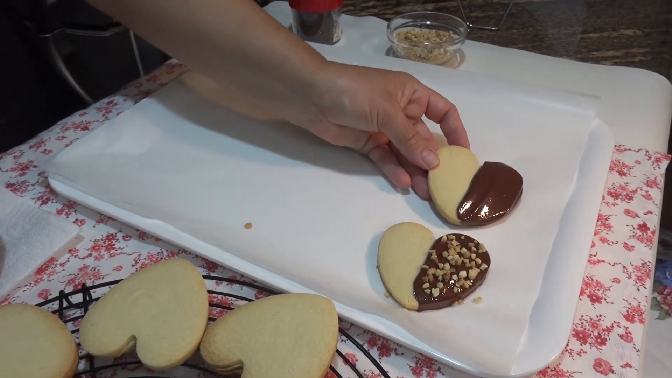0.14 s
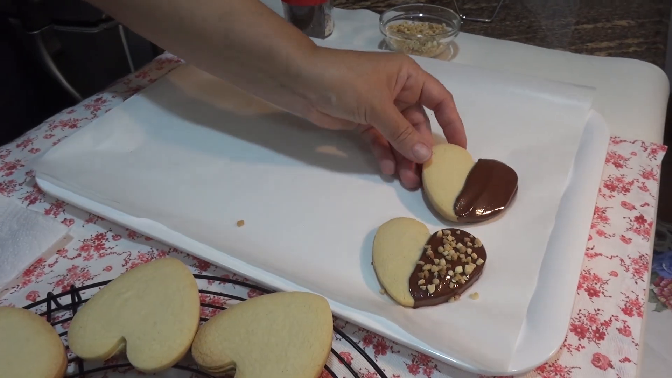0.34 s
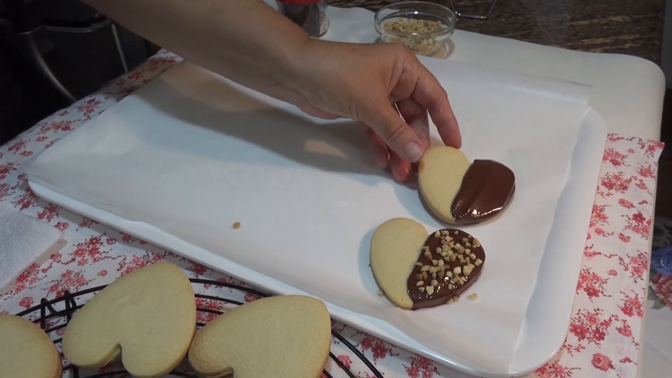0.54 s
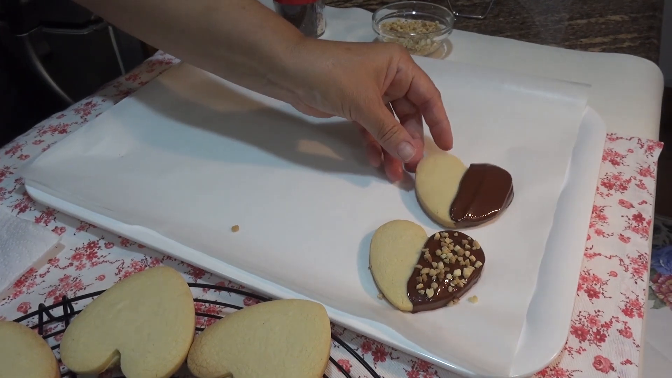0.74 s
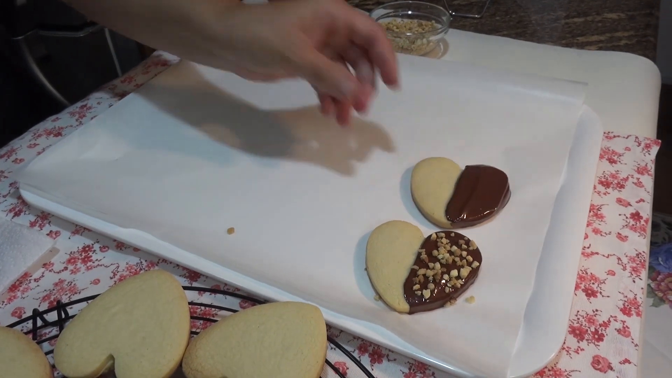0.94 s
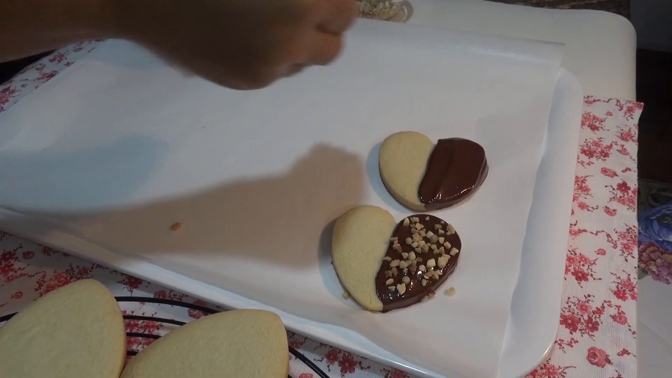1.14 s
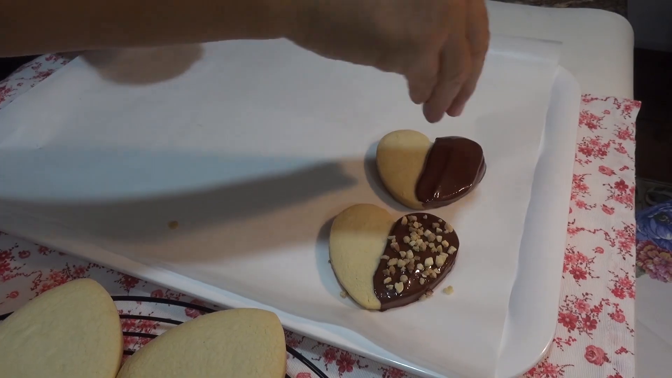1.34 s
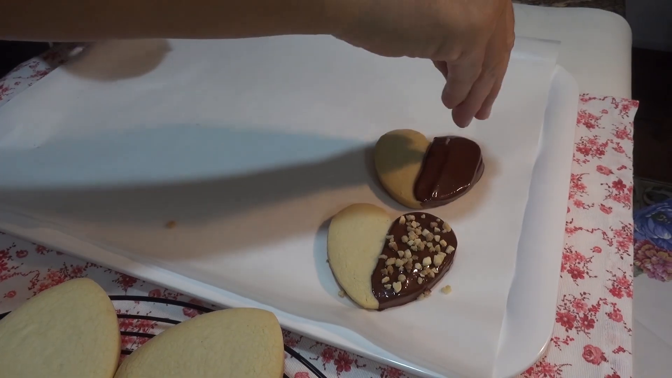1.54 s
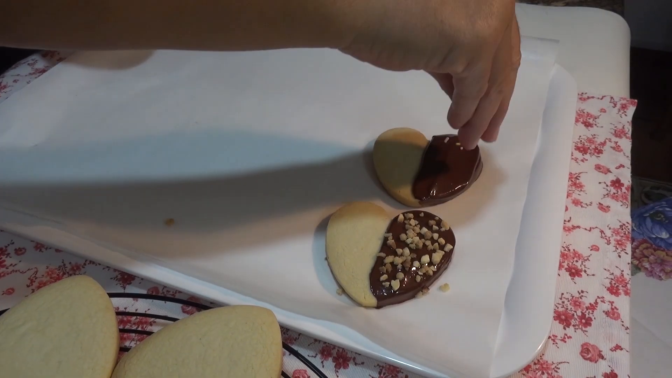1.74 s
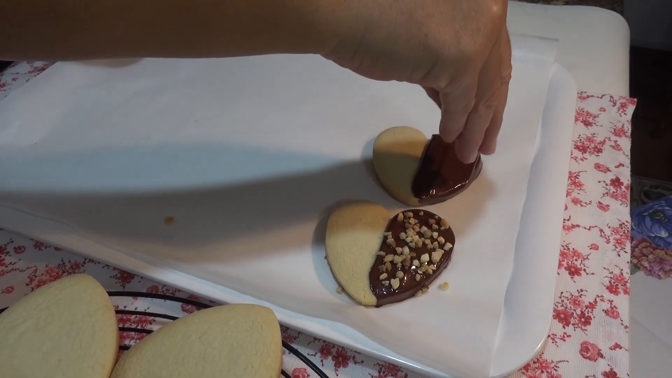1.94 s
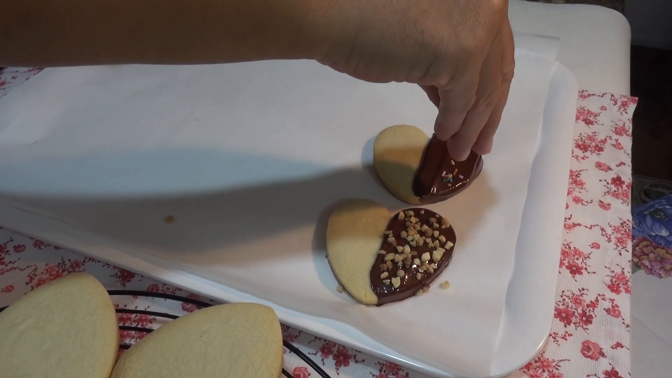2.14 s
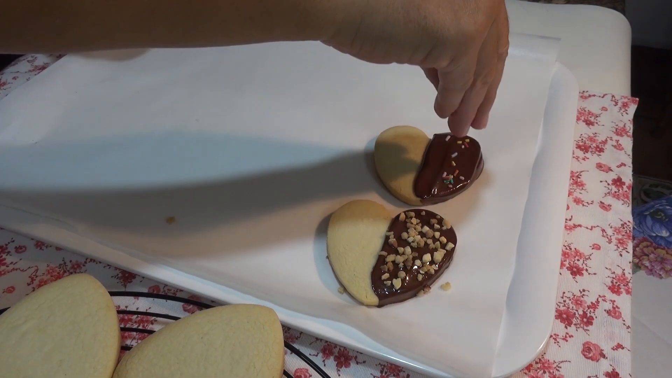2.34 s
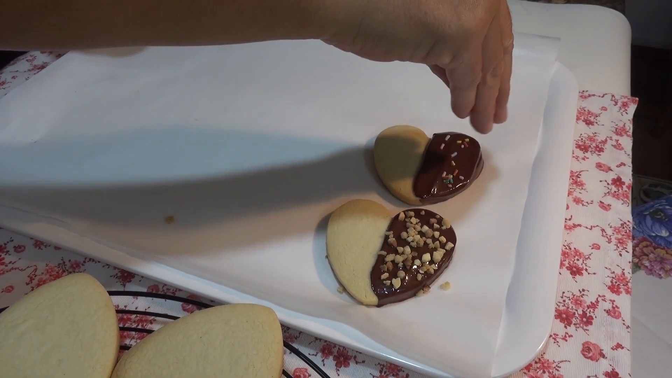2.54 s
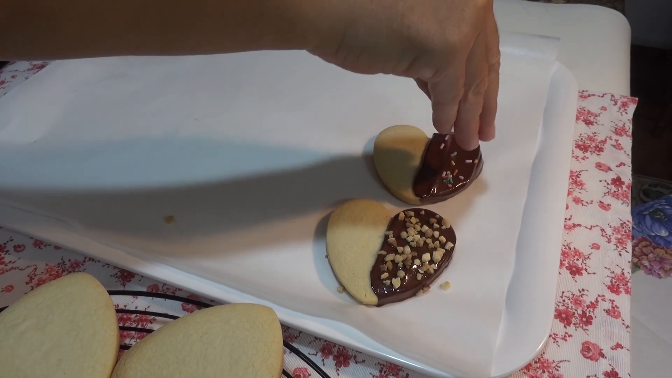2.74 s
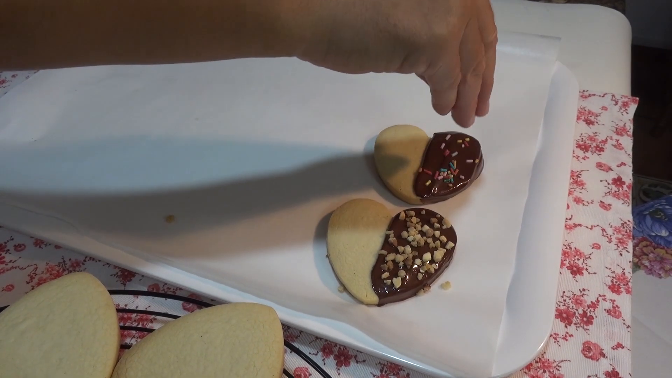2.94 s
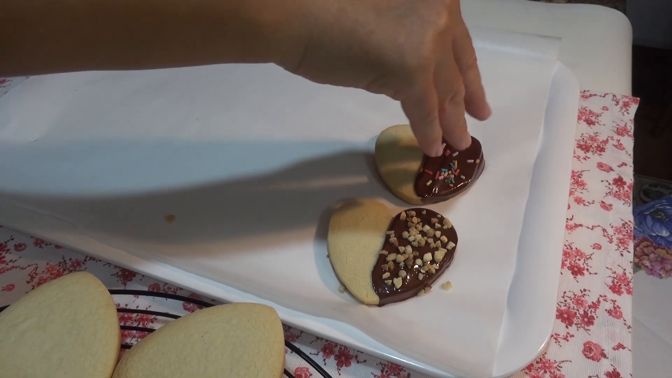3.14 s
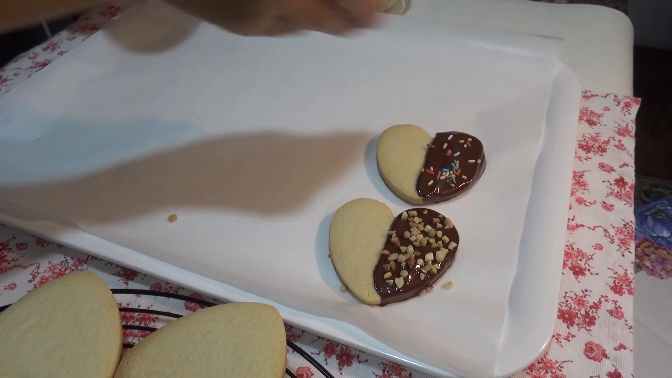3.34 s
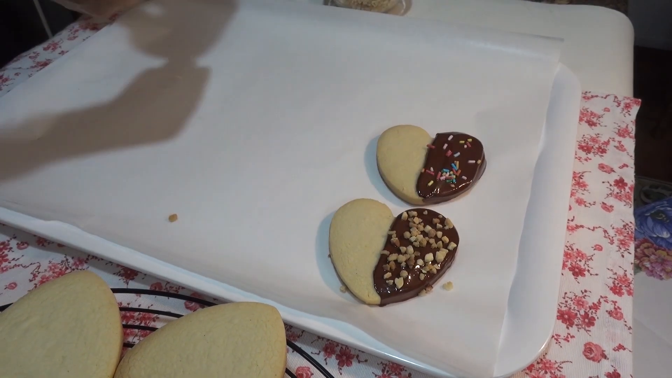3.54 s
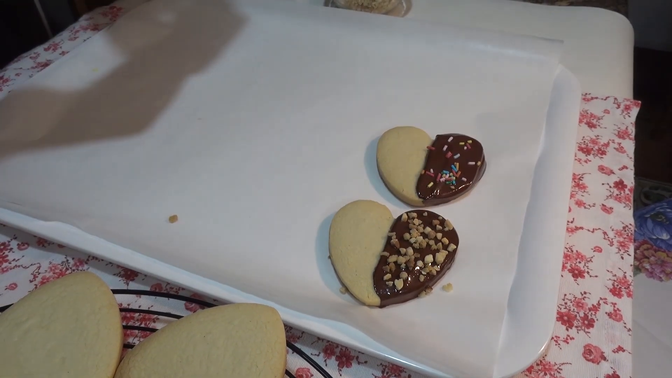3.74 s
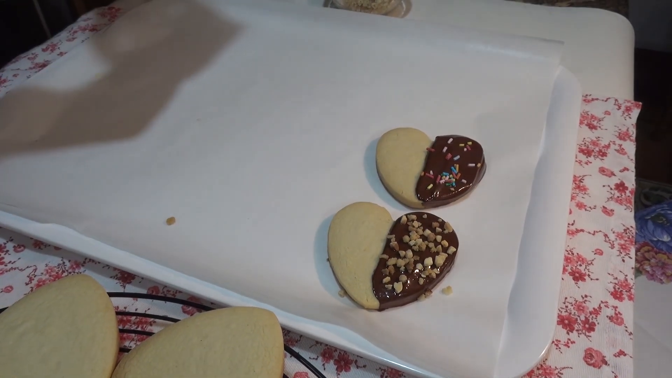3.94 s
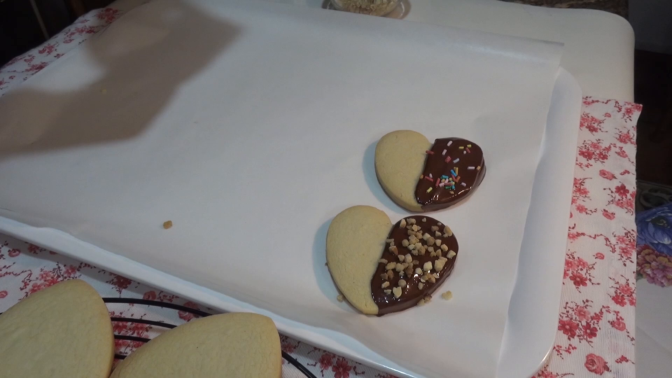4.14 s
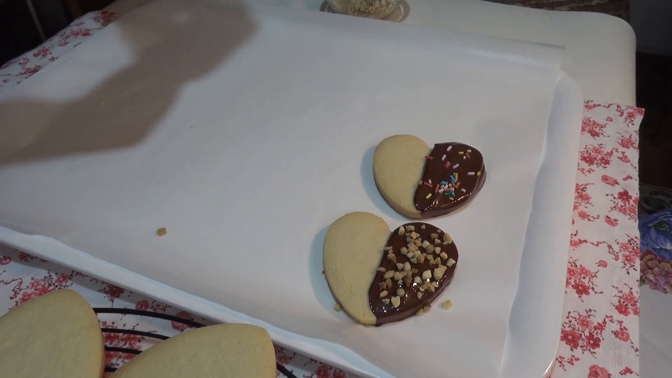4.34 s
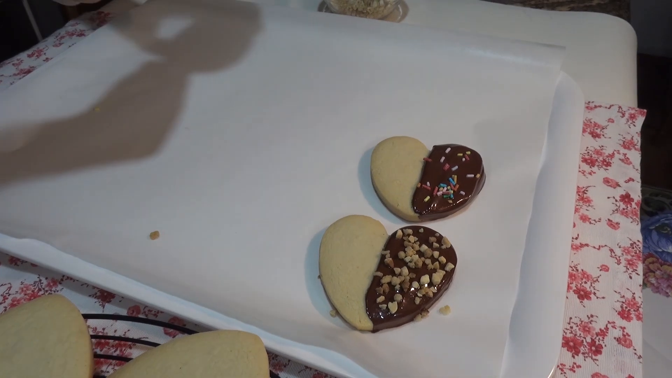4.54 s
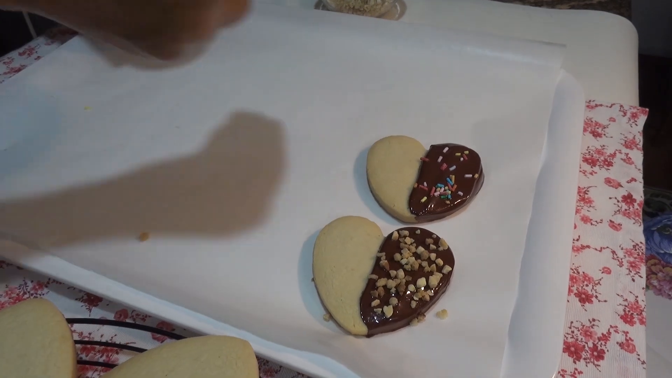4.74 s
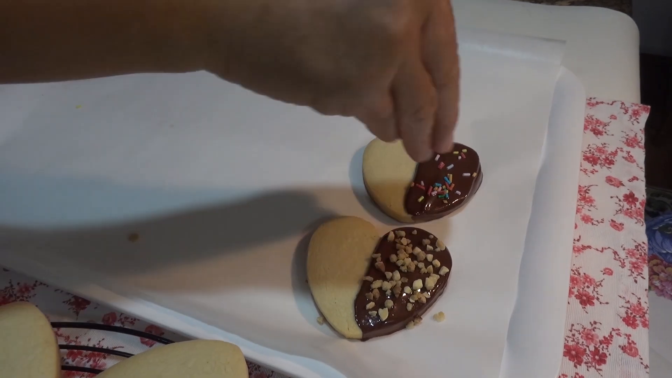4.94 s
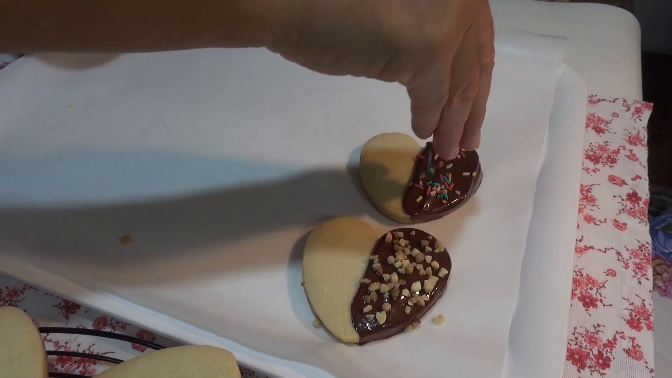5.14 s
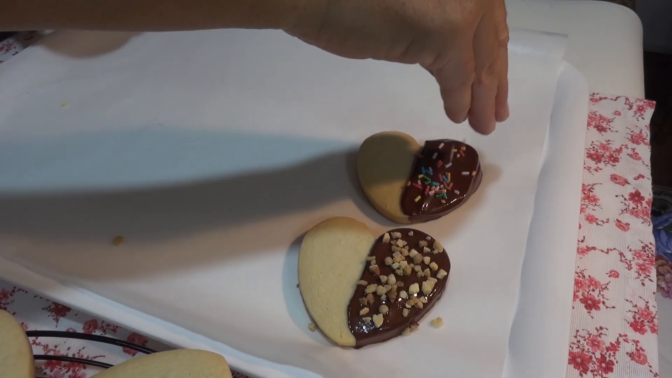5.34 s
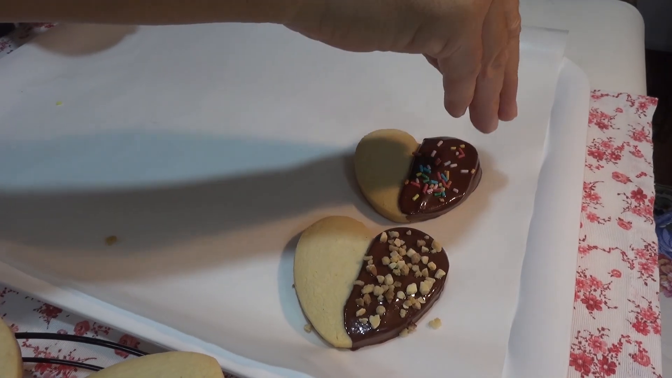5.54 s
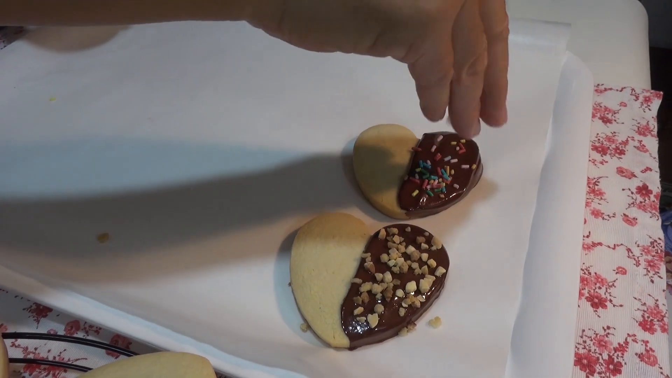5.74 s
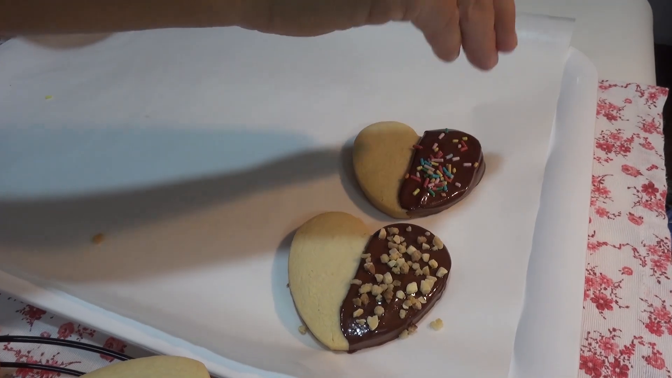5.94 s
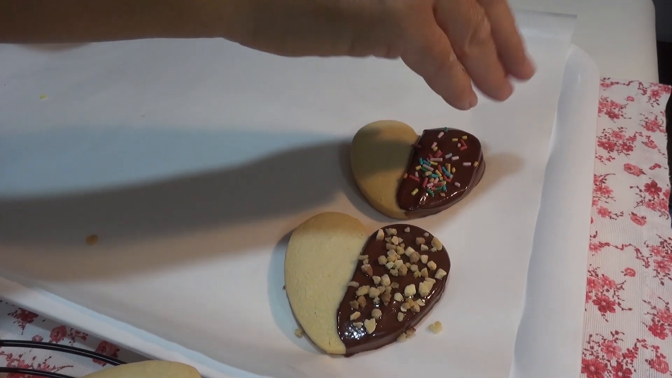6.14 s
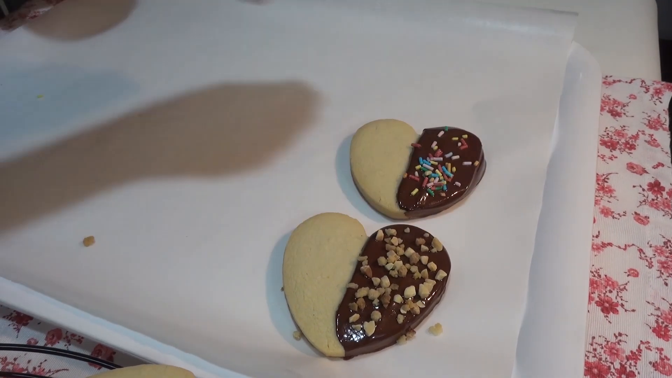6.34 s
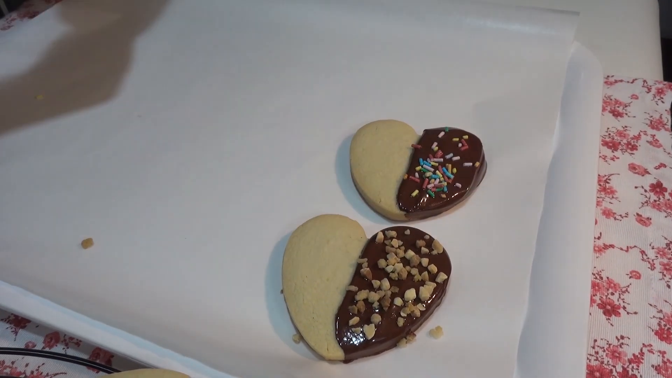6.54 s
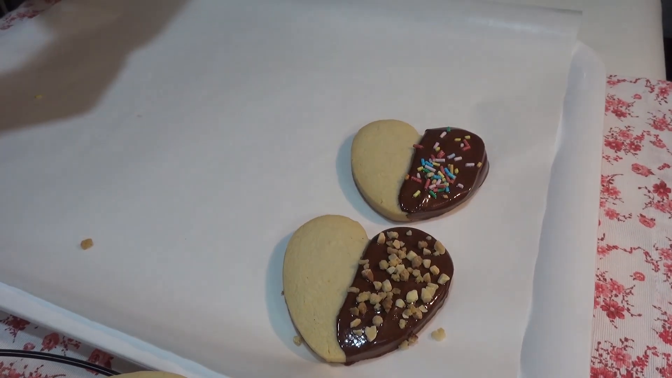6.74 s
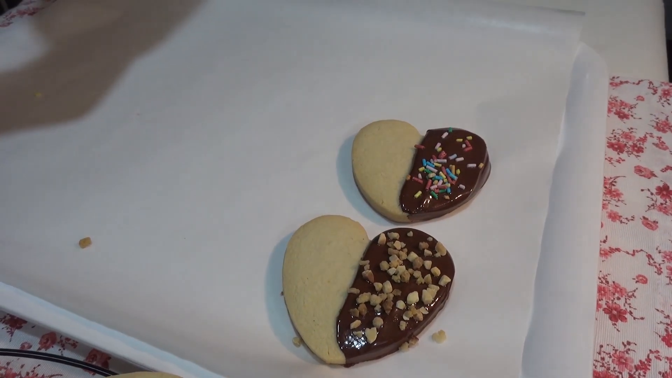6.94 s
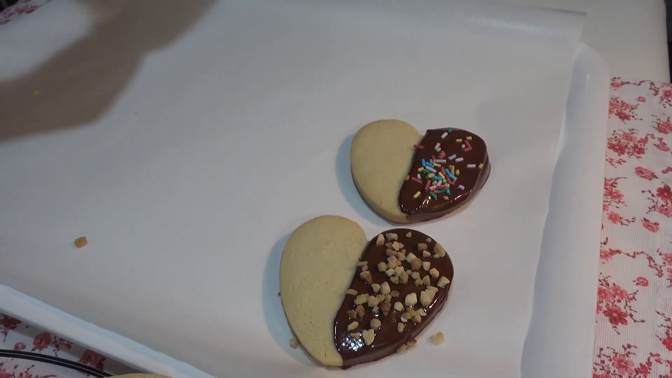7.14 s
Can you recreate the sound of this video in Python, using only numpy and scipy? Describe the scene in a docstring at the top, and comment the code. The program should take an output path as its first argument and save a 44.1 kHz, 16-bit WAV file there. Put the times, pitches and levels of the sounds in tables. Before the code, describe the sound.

Close stereo microphones in a small kitchen with a steady low motor hum and dull air rush. A cookie slides briefly on baking paper with ticks and soft taps, then a dish knocks sharply. A thin bag crackles briefly, sparse tiny sprinkles tick, and fingers rummage loudly in crisp plastic. More sprinkles patter with a dull scuff, then a shorter bag crackle ends it.

```python
"""Sprinkles are put on chocolate-dipped cookies on a paper-lined tray, in a small kitchen with a motor.
Sine harmonics hum and coloured noise rushes throughout. A cookie slides into place: hissing paper, ticks, damped taps.
A dish is knocked (decaying modes and noise clatter). At 1.2 s the hum jumps in phase with a low thump,
and a thin plastic bag crackles briefly. Sprinkles tick (ringing noise bursts), fingers dig in the bag
(crackle, ringing folds, snaps), more sprinkles fall with a dull scuff, and the fingers dig again."""
import sys
import numpy as np
from scipy import signal
from scipy.fft import rfft, irfft
from scipy.io import wavfile
from scipy.ndimage import uniform_filter1d

SR = 44100
rng = np.random.default_rng(int(sys.argv[2]) if len(sys.argv) > 2 else 0)


def waveform_to_disk(signal):
    """Save audio, clipped to [-1, 1], as 16-bit WAV at the path in sys.argv[1]."""
    frames = np.transpose(np.atleast_2d(signal))
    scaled = np.clip(frames, -1, 1) * 32767
    samples = np.round(scaled).astype(np.int16)
    wavfile.write(sys.argv[1], SR, samples)


N = 321048


def from_db(db):
    """Decibels to gain."""
    return 10 ** (np.asarray(db) / 20)


def rms_one(x):
    """Scale to unit power."""
    return x / np.sqrt(np.mean(x ** 2) + 1e-20)


def at_hz(points, hz):
    """Read a table on a log-frequency axis."""
    table_hz, values = np.array(points).T
    return np.interp(np.log(np.maximum(hz, 1)), np.log(table_hz), values)


def colour(x, spectrum, size=4096):
    """Causal (minimum-phase) filter with the given spectrum."""
    gain = from_db(at_hz(spectrum, np.fft.rfftfreq(size, 1 / SR)))
    cepstrum = irfft(np.log(gain))
    cepstrum[1:size // 2] *= 2
    cepstrum[size // 2 + 1:] = 0
    response = irfft(np.exp(rfft(cepstrum)))
    return signal.fftconvolve(x, response[None], axes=-1)[:, :x.shape[-1]]


def butter(x, order, hz, kind="low"):
    """Butterworth filter."""
    return signal.sosfilt(signal.butter(order, hz, kind, fs=SR, output="sos"), x)


def resonate(x, hz, width_hz):
    """One resonance, gain 1 on top."""
    r, w = np.exp(-np.pi * width_hz / SR), 2 * np.pi * hz / SR
    return signal.lfilter(np.array([1, 0, -1]) * (1 - r * r) / 2, [1, -2 * r * np.cos(w), r * r], x)


def stereo_noise(length, side_db):
    """White noise, nearly alike at two close microphones."""
    mid, side = rng.standard_normal((2, length))
    return mid + from_db(side_db) * side * [[1], [-1]]


def drift(knots_per_s):
    """Slow random wander, its knots of spread 1."""
    knots = rng.standard_normal(1000)
    return np.interp(np.arange(N) / SR * knots_per_s, np.arange(len(knots)), knots)


def add(out, start_s, sound):
    """Mix a short sound in at its start time."""
    start = max(round(start_s * SR), 0)
    part = out[:, start:start + sound.shape[-1]]
    part += sound[..., :part.shape[-1]]


SWELL_DB = 49  # span of one rise or release time


def swell(full_s, level_db, rise_s, hold_s, release_s):
    """Gain of one push of the hand: it builds, holds and lets go, evenly in dB."""
    t = np.arange(N) / SR
    before = np.maximum(full_s - t, 0) / max(rise_s, 1e-3)
    after = np.maximum(t - full_s - hold_s, 0) / max(release_s, 1e-3)
    return from_db(level_db - SWELL_DB * np.minimum(before + after, 10))


def even(burst, span_hz=900):
    """Level out a burst's broad chance colour, so what it excites sets the pitch, and fade it."""
    spectrum = rfft(burst)
    bins = max(round(span_hz * burst.shape[-1] / SR), 1)
    power = uniform_filter1d(np.mean(np.abs(spectrum) ** 2, axis=0), bins)
    return irfft(spectrum / np.sqrt(power + 1e-12)) * np.linspace(1, 0, burst.shape[-1]) ** 2


SNAP_BUILD_S = .00022


def snaps(events, crack_s, flutter_s, flutter_db, broad_db, size=2048):
    """A snap is a brief crack ringing about its own pitch, then a weaker flutter of the sheet around it."""
    out, t = np.zeros((2, N)), np.arange(size) / SR
    decay = np.exp(-t / crack_s) + from_db(flutter_db) * np.exp(-t / flutter_s)
    envelope = (1 - np.exp(-t / SNAP_BUILD_S)) * decay
    level_samples = round(.0015 * SR)  # level: the snap's whole energy as if spread over this time
    for start_s, level_db, ring_hz, width in events:
        burst = even(stereo_noise(size, side_db=-15.5) * envelope)
        sound = resonate(burst, ring_hz, width * ring_hz) + from_db(broad_db) * burst
        # a small patch of sheet radiates little below its pitch
        sound = butter(sound, 6, ring_hz * 0.29, "high")
        # and the purer its ring, the less above it
        top_hz = np.clip(ring_hz * (1.1 + 1.8 * width), 1500, 18000)
        sound = butter(sound, 3, top_hz)
        add(out, start_s, from_db(level_db) * sound / np.sqrt(np.sum(sound ** 2) / (2 * level_samples)))
    return out


def crackle(per_s, spread_db, spectrum, grain_s):
    """Countless tiny buckles, uneven and clumped, each ringing at a pitch of its own; rms 1."""
    sizes = from_db(spread_db * np.minimum(rng.exponential(1, N), 3.2))
    chance = per_s * from_db(3 * drift(90)) / SR
    buckles = sizes * (rng.random(N) < chance)
    pitches_hz = np.geomspace(900, 15000, 13)
    dealt, noise, out = rng.integers(0, len(pitches_hz), N), stereo_noise(N, side_db=-19.5), 0
    for k, hz in enumerate(pitches_hz):
        strikes = buckles ** 2 * (dealt == k) + 1e-18
        power = signal.lfilter([1], [1, -np.exp(-2 / (grain_s * SR))], strikes)
        out = out + resonate(noise * np.sqrt(power), hz, .25 * hz)
    return rms_one(colour(out, spectrum))


HUM_HZ, BEAT_HZ = 100.11, 2.39
# motor harmonics: multiple of HUM_HZ, level_db (rms, before throb and waver), left_minus_right_db, waver_db
HUM_HARMONICS = [(1, -50.5, -2, 1.64), (2, -66.5, 2, 2), (3, -58.5, 5, 2.5)]


def hum(beat_db=0.34, sag_db=-1.5):
    """A motor hums on the mains and throbs slowly as its rotor slips; a jump in phase is heard once."""
    t, out = np.arange(N) / SR, 0
    jump_cycles = np.interp(t, [1.202, 1.212], [0, .45])
    cycles = HUM_HZ * t + jump_cycles
    throb_db = beat_db * np.cos(2 * np.pi * BEAT_HZ * (t - .05)) + sag_db * (t / t[-1] - .5)
    for order, base_db, pan_db, waver_db in HUM_HARMONICS:
        order = round(order)
        wander_db = waver_db * np.clip(drift(11), -1, 1)
        sides_db = pan_db * np.array([[.5], [-.5]])
        level_db = base_db + throb_db / order + wander_db + sides_db
        out = out + np.sqrt(2) * from_db(level_db) * np.sin(2 * np.pi * order * cycles)
    return out


AIR_MODE_HZ, AIR_MODE_WIDTH_HZ, AIR_MODE_DB = 543.2, 13.6, 0
# room rush spectrum: freq_hz, density_db (per Hz, relative)
AIR_SPECTRUM = [(25, -8.5), (55, -7.5), (82, 1), (120, 2), (190, 9.5), (260, 3.5), (380, -3.5), (530, -1.5),
                (750, -5), (1300, -5), (1900, -9.5), (2150, -14.5), (5000, -23), (9500, -25.5),
                (14000, -25)]


def air():
    """The dull, steady rush of the room, with a faint resonance."""
    rush = from_db(-53.5) * rms_one(colour(stereo_noise(N, side_db=-9), AIR_SPECTRUM))
    return rush + from_db(AIR_MODE_DB) * resonate(rush, AIR_MODE_HZ, AIR_MODE_WIDTH_HZ)


PAPER_WIDTH = 0.33  # ring width / pitch
# slides over baking paper: full_s, level_db, rise_s, hold_s, release_s (times per SWELL_DB)
PAPER_SLIDES = [(0.166, -54, 0.44, 0.019, 0.13), (0.25, -61, 0.11, 0.25, 0.63),
                (0.728, -59, 0.083, 0.016, 0.17)]
# paper ticking where touched or hit: start_s, level_db (before trim), ring_hz
PAPER_TICKS = [(0.1735, -53, 4700), (0.2515, -46, 4870), (0.2695, -41, 2000), (0.2705, -38.5, 3780),
               (0.27, -42, 9500), (0.307, -43, 5500), (0.3077, -39.5, 3220), (.548, -55, 3820),
               (0.7815, -37.5, 5500), (0.87, -48, 5460), (1.0017, -48, 3700), (3.1862, -39.5, 8850),
               (3.1873, -49, 2680), (5.3488, -48.5, 3530)]
# paper crackle spectrum: freq_hz, density_db (per Hz, relative)
PAPER_SPECTRUM = [(500, 15), (1800, -2.5), (3300, 0.5), (5000, 0.5), (8000, 3.5), (10500, -2), (15500, -7)]


def paper():
    """The baking paper hisses and crackles where it is touched."""
    pressure = sum(swell(*slide) for slide in PAPER_SLIDES)
    rub = crackle(per_s=4000, spread_db=2.5, spectrum=PAPER_SPECTRUM, grain_s=.0015)
    events = [(*row, PAPER_WIDTH) for row in PAPER_TICKS]
    ticks = snaps(events, crack_s=0.0006, flutter_s=0.004, flutter_db=-17, broad_db=-18)
    return pressure * rub + from_db(-1.0) * ticks


BUMP_BUILD_S = .0004
# soft bumps of fingers and cookies: start_s, level_db (before tap and rattle trims), ring_hz
SOFT_BUMPS = [(0.27, -34.5, 1240), (0.3068, -37, 1180), (0.5312, -25, 1630), (3.517, -46, 1510),
              (3.697, -32.5, 1420), (3.9962, -27, 1980), (4.001, -28, 1490), (4.097, -32.5, 1690),
              (4.171, -39, 1800), (4.2319, -28, 1760), (4.232, -30, 3120), (4.472, -34.5, 1680),
              (6.928, -32, 1670), (6.962, -35, 1640), (7.026, -32.5, 1940), (7.103, -35.5, 1930),
              (7.1528, -33, 2400)]


def bumps(tap_db=-5, rattle_db=-8, soft_hz=3400, size=2048):
    """Soft contacts give woody taps: a few cycles that swell and die, with a short dull rattle."""
    out, t = np.zeros((2, N)), np.arange(size) / SR
    age = t / BUMP_BUILD_S
    envelope = (age / 2) ** 2 * np.exp(2 - age)
    for start_s, level_db, ring_hz in SOFT_BUMPS:
        add(out, start_s, from_db(level_db + tap_db) * envelope * np.sin(2 * np.pi * ring_hz * t))
    events = [(*row, .5) for row in SOFT_BUMPS]
    rattle = snaps(events, crack_s=.0016, flutter_s=.009, flutter_db=-16, broad_db=-16)
    return out + from_db(rattle_db) * butter(rattle, 4, soft_hz)


# low thumps, the last with the hum's phase jump: start_s, level_db (sine peak before decay)
LOW_THUMPS = [(0.306, -41), (.46, -52), (1.199, -41)]


def low_thumps(hz=55, decay_s=0.0077, size=8192):
    """A low sine swing dies almost at once."""
    out, t = np.zeros((2, N)), np.arange(size) / SR
    for start_s, level_db in LOW_THUMPS:
        add(out, start_s, from_db(level_db) * np.sin(2 * np.pi * hz * t) * np.exp(-t / decay_s))
    return out


# knocks of a dish on the table: start_s, level_db (scales modes and clatter)
DISH_KNOCKS = [(.7705, -45), (0.7805, -20.5)]
# dish modes: freq_hz, level_db (relative to the knock), t60_s
DISH_MODES = [(187, -18.5, 0.046), (450, -6.5, 0.025), (530, 2.5, 0.034), (614, 3.5, 0.026),
              (730, 1.5, 0.027), (1120, -1.5, 0.017), (1290, 0.5, 0.022), (1370, -1, 0.022),
              (1568, -8.5, 0.08), (1760, -24, 0.059), (2120, -8.5, 0.02), (2590, -20, 0.042),
              (2820, -11, 0.027), (3300, -16.5, 0.048), (4020, -19, 0.035)]
# clatter spectrum: freq_hz, density_db (per Hz, relative)
CLATTER_SPECTRUM = [(150, -10), (480, 3), (950, -1), (1550, 4), (2300, -6), (3200, -1), (4500, -13.5),
                    (7000, -18), (10000, -29), (15000, -30)]


def dish(clatter_db=-7, crack_s=0.0041, rattle_db=-13, rattle_s=0.066, lowest_hz=110, size=16384):
    """Every blow rings the same damped modes, panned by pitch, and sets off a short dense clatter."""
    out, t = np.zeros((2, N)), np.arange(size) / SR
    ring = 0
    for k, (hz, level_db, t60_s) in enumerate(DISH_MODES):
        pan_db = at_hz([(550, 2.5), (1300, -3.0), (2800, -8.0)], hz) * np.array([[1], [-1]])
        gain = from_db(level_db + pan_db - 60 * t / t60_s)
        ring = ring + (-1) ** k * gain * np.sin(2 * np.pi * hz * t)
    envelope = np.exp(-t / crack_s) + from_db(rattle_db) * np.exp(-t / rattle_s)
    for start_s, level_db in DISH_KNOCKS:
        clatter = rms_one(colour(stereo_noise(size, side_db=-13), CLATTER_SPECTRUM)) * envelope
        add(out, start_s, from_db(level_db) * (ring + from_db(clatter_db) * clatter))
    return butter(out, 2, lowest_hz, "high")


SNAPS_PER_S, SNAP_HZ, SNAP_SPREAD_OCTAVES = 26, 8000, 1
SNAP_DB, SNAP_SPREAD_DB = -34, 4  # at the hardest squeeze
SNAP_WIDTH = 0.28  # ring width / pitch


def lesser_snaps(force):
    """Chance snaps, stronger the harder the squeeze: start_s, level_db, ring_hz, width."""
    count = int(SNAPS_PER_S * N / SR)
    place, strength, pitch = rng.uniform(-1, 1, (count, 3)).T
    start_s = (np.arange(count) + .5 + .5 * place) / SNAPS_PER_S
    force_db = 20 * np.log10(force[(start_s * SR).astype(int)] / force.max())
    level_db = SNAP_DB + force_db + SNAP_SPREAD_DB * strength
    ring_hz = SNAP_HZ * 2 ** (SNAP_SPREAD_OCTAVES * pitch)
    return list(zip(start_s, level_db, ring_hz, np.full(count, SNAP_WIDTH)))


FOLD_RING_DB = 3.5  # ring over the creases
FOLD_WIDTH, FOLD_CUT = 0.082, 0.71  # ring width and low edge / pitch


def fold(creases, hz):
    """The gripped fold rings at a pitch set by its size and radiates little below it."""
    cut = butter(creases, 6, FOLD_CUT * hz, "high")
    return cut + from_db(FOLD_RING_DB) * resonate(cut, hz, FOLD_WIDTH * hz)


# squeezes: full_s, crackle_db (before trims), rise_s, hold_s, release_s (times per SWELL_DB),
# crease_db (broad creases relative to crackle_db), fold_hz
BAG_SQUEEZES = [(1.206, -60, .005, 0.064, 0.26, 8, 3200), (3.602, -50, 0.2, 0.015, 0.3, -1, 3380),
                (3.695, -36.5, 0.097, 0.051, 0.18, -5.5, 1110), (4.033, -57, 1, 0.17, 0.11, -2, 1240),
                (4.11, -40.5, 0.15, 0.17, 0.23, -9, 1280), (4.427, -51.5, 0.088, 0.11, 0.12, -31, 2450),
                (4.55, -36, 0.12, 0.069, 0.19, -10, 2460), (4.7, -58, 0.085, 0.074, 0.29, 6, 1490),
                (6.625, -40, 0.094, 0.051, 0.093, -5, 2420), (6.758, -51.5, 0.11, 0.027, 0.068, -11, 2400),
                (6.958, -40.5, 0.39, 0.049, 0.51, -6.5, 1150), (7.275, -42.5, 0.092, .02, .1, -8.5, 2390)]
# loudest creases snapping over: start_s, level_db, ring_hz, width (share of pitch)
LOUD_SNAPS = [(1.2089, -42, 6500, 0.9), (1.2176, -39, 5770, 0.46), (1.2387, -49, 5170, 0.32),
              (1.2604, -30, 8350, 0.26), (1.3173, -43, 7000, .6), (1.449, -52, 6460, 0.46),
              (1.4735, -38, 6700, 0.55), (3.451, -51, 4170, .55), (3.5173, -31.5, 5230, 0.62),
              (3.5192, -35.5, 5100, 0.71), (3.5641, -44, 8800, 0.32), (3.5735, -34.5, 11800, 0.69),
              (3.602, -38, 6900, .9), (3.689, -24.5, 9900, 0.11), (3.6957, -30, 5670, 1),
              (3.7152, -18.5, 9850, 0.11), (3.7206, -19, 9550, 0.12), (3.7367, -34, 8900, .3),
              (3.7477, -34, 8800, .3), (3.7502, -31, 5950, 0.18), (3.7721, -42, 9300, .3),
              (3.7882, -41, 9600, .2), (3.8011, -46, 9300, 0.35), (3.8393, -26, 8700, 0.082),
              (3.8474, -29.5, 7240, 0.68), (3.9308, -33, 5900, 0.43), (3.9684, -38, 5000, 0.31),
              (3.9837, -41, 5000, 0.23), (4.0023, -30.5, 5450, 0.57), (4.0271, -35.5, 5900, 0.79),
              (4.0756, -38, 5900, 0.43), (4.0981, -21.5, 7050, 0.34), (4.1108, -30, 5400, 0.24),
              (4.1133, -42, 9400, .55), (4.1453, -26, 8000, 0.16), (4.1479, -30, 8200, .14),
              (4.1558, -36, 7100, .6), (4.1709, -38, 7000, .6), (4.1887, -38, 8400, 0.57),
              (4.1999, -36, 7060, .26), (4.2035, -34, 8300, .35), (4.2063, -29, 7900, 0.18),
              (4.2355, -32, 9100, 0.97), (4.2462, -29, 8100, 0.23), (4.2513, -28, 8600, 0.19),
              (4.2998, -34, 9900, 0.55), (4.3101, -33, 8000, .2), (4.41, -45, 9400, .45),
              (4.4164, -36, 10500, 0.32), (4.4219, -40, 11000, .35), (4.4425, -38, 8600, 0.2),
              (4.4647, -35, 9000, 0.15), (4.5091, -39, 10400, 0.25), (4.5137, -34, 11000, 0.26),
              (4.539, -40, 10600, .4), (4.5437, -28, 6000, 0.9), (4.5645, -27.5, 7300, 0.69),
              (4.6185, -28, 5700, 0.22), (4.6384, -34, 5500, .65), (4.6668, -19.5, 5540, 0.52),
              (4.6699, -23, 6840, 1), (4.7295, -36.5, 7700, 0.86), (4.7835, -32.5, 6750, 1),
              (4.7914, -33, 6860, 0.53), (6.427, -43.5, 8870, 0.21), (6.543, -37, 7900, 1),
              (6.5746, -41, 7200, 0.93), (6.6221, -32.5, 9700, .7), (6.634, -28.5, 9000, 0.17),
              (6.67, -35, 9550, .2), (6.6845, -26, 9550, .3), (6.6872, -25.5, 9200, 0.39),
              (6.733, -38, 12200, 0.35), (6.8868, -32.5, 10400, 0.48), (6.8971, -36, 9600, 0.51),
              (6.9231, -35, 6160, .5), (6.9295, -35.5, 4100, .3), (6.9447, -34, 9600, 0.55),
              (6.9622, -21.5, 5670, 0.13), (6.9815, -30, 10200, .4), (6.9894, -31, 10200, .5),
              (7.001, -27.5, 10700, .4), (7.0257, -26.5, 10500, .5), (7.0275, -33, 8300, 0.8),
              (7.0491, -29, 9800, 0.69), (7.1036, -34, 4930, 0.15), (7.1305, -43, 5500, 0.73),
              (7.1537, -31.5, 8000, 0.9), (7.2251, -39.5, 8300, .25)]
# fine crackle and crease spectra: freq_hz, density_db (per Hz, relative)
FINE_SPECTRUM = [(2000, -65), (4000, -19.5), (6000, -17.5), (8000, -11.5), (10000, -13.5), (12000, -13.5),
                 (15500, -18.5)]
CREASE_SPECTRUM = [(700, -6.5), (1700, -7), (2500, 0.5), (3500, -1.5), (5200, 0.5), (7000, -1),
                   (12000, -14.5), (15500, -32)]


def bag():
    """Fingers squeeze thin plastic: fine crackle, creases ringing in the gripped fold, single snaps."""
    pushes = [(swell(*shape), crease_db, fold_hz) for *shape, crease_db, fold_hz in BAG_SQUEEZES]
    force = np.sqrt(sum(push ** 2 for push, _, _ in pushes))
    fine = crackle(per_s=3600, spread_db=4.2, spectrum=FINE_SPECTRUM, grain_s=.0003)
    creases = crackle(per_s=4000, spread_db=3.8, spectrum=CREASE_SPECTRUM, grain_s=.0008)
    folding = sum(push * from_db(crease_db) * fold(creases, hz) for push, crease_db, hz in pushes)
    events = list(LOUD_SNAPS) + lesser_snaps(force)
    single = snaps(events, crack_s=.00032, flutter_s=.005, flutter_db=-26, broad_db=-21)
    mix = from_db(2.0) * force * fine + from_db(0.5) * folding + single
    return mix * from_db([[.3], [-.3]])


SPRINKLE_HZ, SPRINKLE_SPREAD_OCTAVES = 11700, 0.047  # the rods are alike and ring near one pitch
SPRINKLE_WIDTH = 0.38  # ring width / pitch
# sprinkles landing: start_s, level_db (before trim)
SPRINKLE_LANDINGS = [(1.6416, -41), (1.688, -42), (1.751, -45), (1.7606, -40), (2.1245, -44), (2.1315, -44),
                     (2.1644, -48), (2.81, -46), (2.818, -44), (2.841, -49), (5.1294, -45), (5.141, -48),
                     (5.198, -48), (5.2107, -48), (5.4116, -39), (5.4177, -46), (5.7166, -38.5),
                     (5.7204, -40.5), (5.7623, -46.5), (5.8067, -40), (5.8701, -46), (5.874, -43),
                     (5.8869, -46), (5.908, -38), (5.9266, -42)]


def sprinkles():
    """Tiny sugar rods tick as they land."""
    landings = []
    for start_s, level_db in SPRINKLE_LANDINGS:
        ring_hz = SPRINKLE_HZ * 2 ** (SPRINKLE_SPREAD_OCTAVES * rng.uniform(-1, 1))
        landings.append((start_s, level_db, ring_hz, SPRINKLE_WIDTH))
    ticks = snaps(landings, crack_s=0.00027, flutter_s=0.0043, flutter_db=-28, broad_db=-37)
    return from_db(-5.5) * ticks


# soft scuffs of the hand: start_s, level_db (rms before fade)
HAND_SCUFFS = [(5.898, -43.5)]
# scuff spectrum: freq_hz, density_db (per Hz, relative)
SCUFF_SPECTRUM = [(300, -7), (700, 10), (1500, 5), (3000, -0.5), (4500, -4.5), (8000, -16)]


def scuffs(decay_s=0.027, size=8192):
    """A brief dull brush of noise that fades at once."""
    out, t = np.zeros((2, N)), np.arange(size) / SR
    for start_s, level_db in HAND_SCUFFS:
        brush = rms_one(colour(stereo_noise(size, side_db=-10), SCUFF_SPECTRUM))
        add(out, start_s, from_db(level_db) * brush * np.exp(-t / decay_s))
    return out


# kitchen decay: freq_hz, t60_s
ROOM_T60 = [(200, 0.54), (1000, 0.42), (4000, 0.35), (14000, 0.028)]
# room tail spectrum: freq_hz, gain_db
TAIL_SPECTRUM = [(100, 15), (550, -1.5), (950, -0.5), (1500, -3), (3500, -1.5), (8000, 1), (15000, 17.5)]


def kitchen(x, build_s=0.00018, size=22050):
    """Dense reflections that die sooner in the treble."""
    t, edges_hz, response = np.arange(size) / SR, np.geomspace(100, 18000, 9), 0
    for low_hz, high_hz in zip(edges_hz, edges_hz[1:]):
        band = butter(stereo_noise(size, side_db=-37.0), 2, [low_hz, high_hz], "band")
        t60_s = at_hz(ROOM_T60, np.sqrt(low_hz * high_hz))
        response = response + band * np.exp(-np.log(1000) * t / t60_s)
    response = rms_one(response * (1 - np.exp(-t / build_s))) / np.sqrt(size)
    return signal.fftconvolve(x, colour(response, TAIL_SPECTRUM), axes=-1)[:, :N]


def scene():
    """Handling sounds in the kitchen, over hum and rush."""
    small = paper() + bag() + sprinkles() + scuffs()
    taps, knock = bumps(), dish()
    room = kitchen(from_db(-11.5) * small + from_db(-11.0) * knock + from_db(-12.5) * taps)
    return hum() + air() + small + taps + low_thumps() + knock + room


CUTOFF_HZ = 15950
# stereo width: freq_hz, side_gain_db
STEREO_WIDTH = [(1500, -3), (2800, -15.5), (9000, 4.5), (12500, -12)]


def record(dry):
    """Stereo width varies with frequency and the top is cut steeply."""
    mid = dry.mean(axis=0)
    heard = mid + colour(dry - mid, STEREO_WIDTH)
    return signal.sosfilt(signal.ellip(12, .1, 80, CUTOFF_HZ, fs=SR, output="sos"), heard)


dry = scene()
out = record(dry)
waveform_to_disk(out)
```